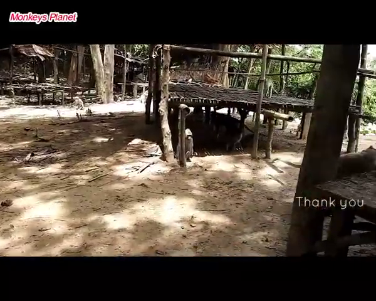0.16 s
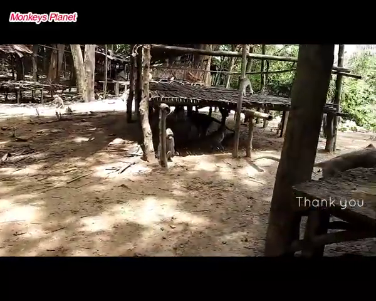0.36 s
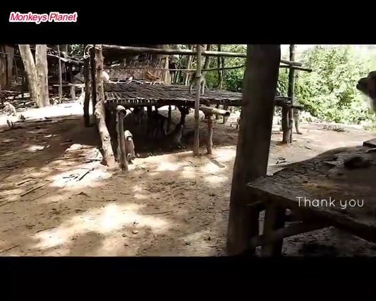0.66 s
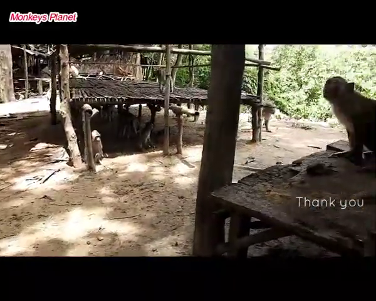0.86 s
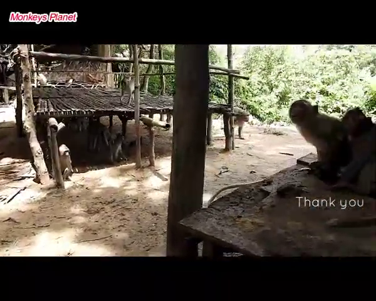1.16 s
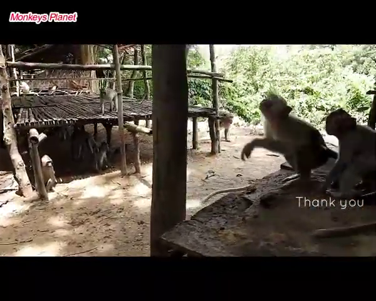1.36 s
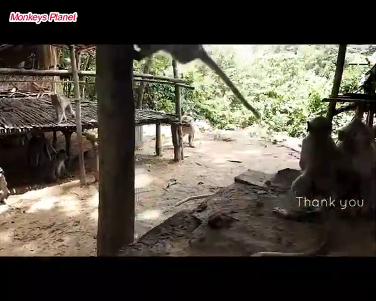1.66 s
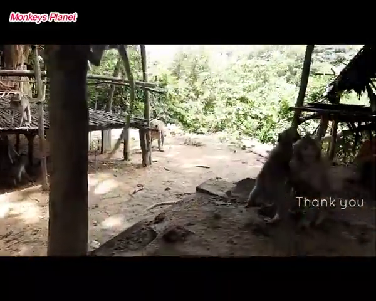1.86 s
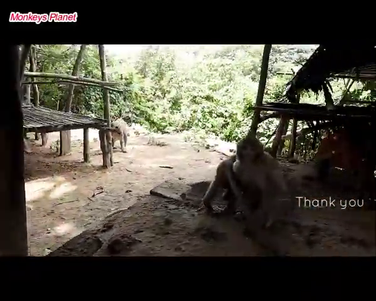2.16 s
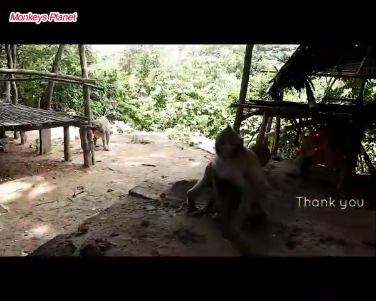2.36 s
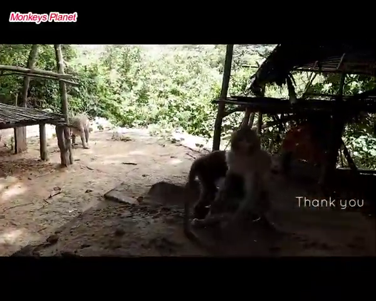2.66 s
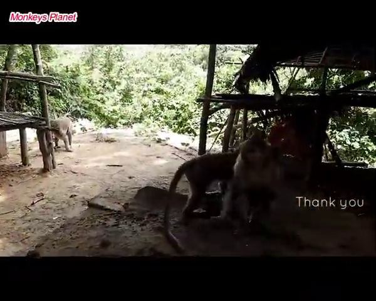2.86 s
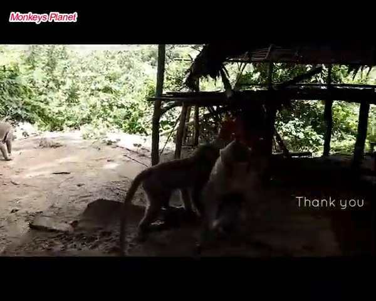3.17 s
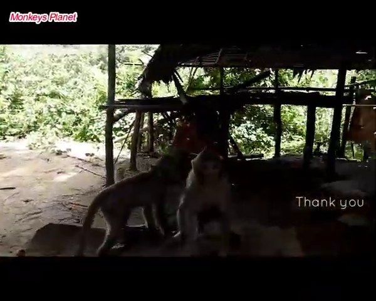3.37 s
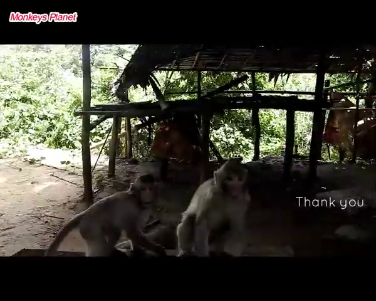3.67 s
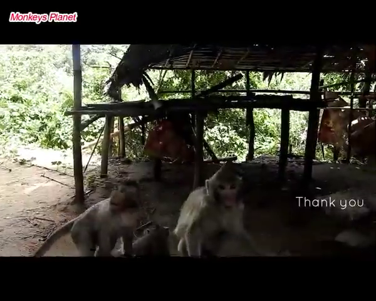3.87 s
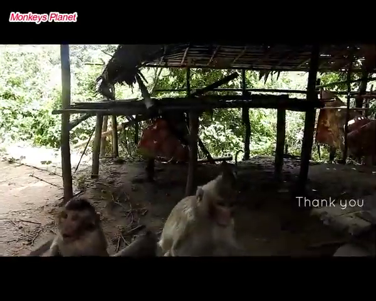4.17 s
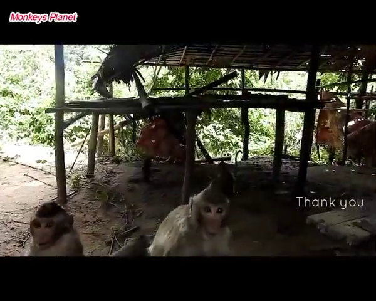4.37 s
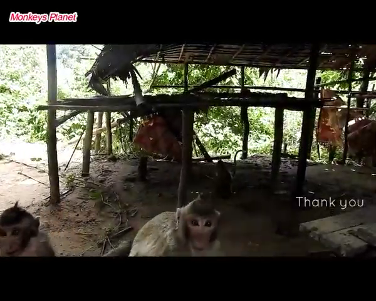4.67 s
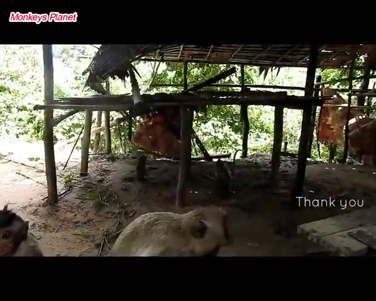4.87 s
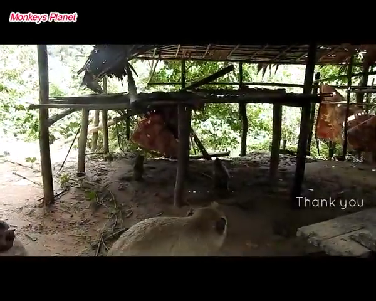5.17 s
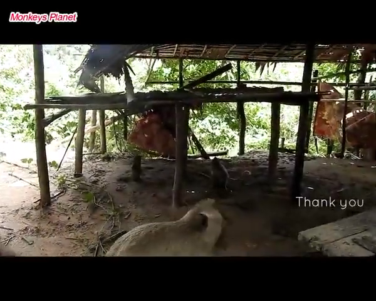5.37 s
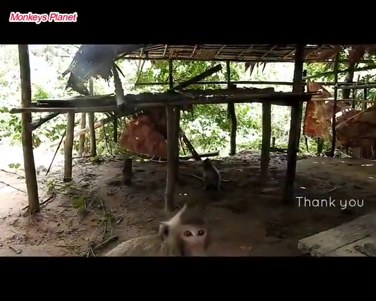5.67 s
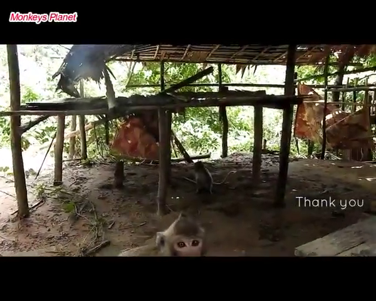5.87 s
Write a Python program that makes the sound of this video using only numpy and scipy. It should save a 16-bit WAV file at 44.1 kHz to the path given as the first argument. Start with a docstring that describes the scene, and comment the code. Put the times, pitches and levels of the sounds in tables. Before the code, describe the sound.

Harsh high monkey screams, two long then shorter ones, ring off wooden huts; afterwards low air buffeting and bumps on the microphone.

```python
"""A forest yard with wooden shelters: a macaque shrieks seven times, close to a hand-held camera.
Each shriek is two coupled oscillators: a high whistle beats against a lower fold vibration and turns to rasp.
Boards return early echoes, and huts and trees a noise tail. Cicadas drone in a wash of leaves, both filtered noise.
Puffs of air are lumpy low noise, handling thumps are short swings with a snap, knocks are grainy resonant bursts."""
import sys
import numpy as np
from scipy import signal
from scipy.fft import rfft, irfft, next_fast_len
from scipy.io import wavfile
from scipy.ndimage import uniform_filter1d, map_coordinates

SR = 44100
rng = np.random.default_rng(int(sys.argv[2]) if len(sys.argv) > 2 else 0)


def inscribe(sig):
    """Save sig as 16-bit PCM at rate SR to the path in sys.argv[1].

    A 1-D sig is mono; a 2-D sig holds one channel per row.
    Samples are clipped to [-1, 1] before scaling.
    """
    pcm = np.round(np.clip(np.atleast_2d(sig).T, -1, 1) * 32767)
    wavfile.write(sys.argv[1], SR, pcm.astype(np.int16))


N = 265638
TIME = np.arange(N) / SR


def amp(db):
    """Decibels to gain."""
    return 10 ** (np.asarray(db) / 20)


def unit(x):
    """Scales to rms 1."""
    return x / np.sqrt(np.mean(x ** 2) + 1e-20)


def steady(x, size=400):
    """Holds the short-time rms at 1 over a window of size samples."""
    return x / np.sqrt(abs(uniform_filter1d(x ** 2, size)) + 1e-12)


def read(points, hz):
    """Reads a spectrum table on a log-frequency axis."""
    f, value = np.transpose(points)
    return np.interp(np.log(hz + 1), np.log(f + 1), value)


def colour(x, points):
    """Filters by a table of (Hz, dB)."""
    n = x.shape[-1]
    size = next_fast_len(n + 1000)
    gain = amp(read(points, np.fft.rfftfreq(size, 1 / SR)))
    return irfft(rfft(x, size) * gain, size)[..., :n]


def wander(n, rate_hz):
    """Random drift of rms 1, rolled off above the rate."""
    hz = np.fft.rfftfreq(n, 1 / SR)
    return unit(irfft(rfft(rng.standard_normal(n)) / np.sqrt(1 + (hz / rate_hz) ** 4), n))


def hiss_at(hz, width_hz, n):
    """Noise in a resonance that follows hz."""
    angle = 2 * np.pi * np.cumsum(hz * np.ones(n)) / SR
    return unit(wander(n, width_hz / 2) * np.cos(angle) + wander(n, width_hz / 2) * np.sin(angle))


def ramp(t, length):
    """Smooth step from 0 to 1, centred on t = 0."""
    return .5 + .5 * np.sin(np.pi * np.clip(t / length, -.5, .5))


def bump(t, s, half_length):
    """Bell of height 1 around time s."""
    return np.exp(-((t - s) / half_length) ** 2)


def add(mix, s, sound):
    """Mixes a sound in at time s."""
    part = mix[..., max(round(s * SR), 0):][..., :sound.shape[-1]]
    part += sound[..., :part.shape[-1]]


def monkey(left_db=-0.7, right_db=-0.47):
    """The shrieks come from the right, so they reach the left port a little later."""
    # one row a shriek: start_s, length_s, level_db, swell_db from start to end,
    # low throat resonance: throat_db, throat_swell_db; coupling of the two vibrations [ratio], roughness [0-1],
    # soft lead_s, soft tail_s, soft_db of both, rasp left in them [0-1]
    shriek_rows = [(0, 0.5, -15, -0.5, -24.5, -7, 1.08, 0.86, 0.054, 0.015, -3.5, 0.52),
                   (0.733, 1.116, -14.5, -1.5, -29.5, 5, 0.91, 0.74, 0.21, 0.05, -6.5, 0.37),
                   (1.926, 0.38, -16, -3.5, -36.5, -24.5, 0.66, 0.74, 0.055, 0.018, -8.5, 0.51),
                   (2.469, 0.18, -17, 2.5, -48, 0, 2, 0.68, 0.042, 0.069, -6, 0),
                   (2.877, 0.14, -19.5, 0.5, -37, -16, 0.8, 0.73, 0.0263, 0.039, -3, 0.11),
                   (3.161, 0.22, -16.5, -2, -35.5, -23, 0.38, 0.87, 0.046, 0.04, -6.5, 0.3),
                   (3.517, 0.46, -16, 3, -33, 11, 0.88, 0.81, 0.034, 0.025, -4, 0.08)]
    # pitch of each shriek: time_s, whistle_hz, lower_vibration_hz
    pitch_curves = [
        [(0, 5400, 2750), (.05, 5740, 2886), (.092, 5480, 3205), (.113, 4300, 2565), (.19, 5100, 2890),
         (.25, 5484, 2700), (.33, 4450, 2560), (.4, 5160, 2398), (.485, 4606, 2344)],
        [(.735, 4985, 2190), (.762, 5400, 2102), (.788, 5180, 2050), (.84, 5293, 2012), (.895, 5415, 2800),
         (.92, 5380, 2200), (.955, 5730, 2606), (1.04, 5240, 2628), (1.06, 5155, 2508), (1.07, 5866, 1950),
         (1.11, 5094, 2193), (1.158, 6010, 2000), (1.183, 5460, 1897), (1.198, 5750, 1912), (1.215, 5290, 1850),
         (1.226, 5120, 2600), (1.3, 5282, 2555), (1.43, 4757, 2598), (1.51, 4690, 3012), (1.68, 4970, 2945),
         (1.745, 4606, 2463), (1.775, 4330, 2700), (1.805, 4310, 2805)],
        [(1.925, 5650, 2720), (1.97, 5475, 2702), (1.997, 6600, 2720), (2.015, 5440, 2725), (2.06, 5246, 2850),
         (2.12, 4850, 2456), (2.165, 5230, 3285), (2.2, 4670, 3120), (2.265, 4900, 2675), (2.3, 4390, 2674)],
        [(2.468, 5930, 1490), (2.488, 6680, 1496), (2.505, 6620, 1475), (2.518, 5800, 1500),
         (2.575, 5730, 1544), (2.59, 5190, 1630), (2.615, 5327, 1470), (2.65, 4150, 1520)],
        [(2.878, 6430, 1840), (2.905, 5910, 1813), (2.965, 5610, 1522), (2.99, 5520, 1480), (3.015, 4940, 1500)],
        [(3.162, 7210, 2210), (3.19, 5860, 2150), (3.235, 6610, 2217), (3.28, 5780, 2170), (3.352, 4660, 2000),
         (3.37, 4800, 2000), (3.384, 4670, 2000)],
        [(3.517, 5470, 2416), (3.529, 5930, 2410), (3.555, 5280, 2465), (3.72, 4296, 2509), (3.83, 4610, 2648),
         (3.885, 5200, 3297), (3.92, 4400, 2716), (3.939, 3950, 2555), (3.944, 5200, 2510), (3.975, 3960, 2480)],
    ]
    # bearing of the monkey as the camera turns: time_s, left_lag_samples
    bearing = [(0, 1.4), (2.5, 1.34), (3.6, 0.2)]
    # the camera body shades the left port: frequency_hz, gain_db
    left_shade = [(2700, -1.5), (4800, 0)]
    voice = np.zeros(N)
    for row, pitch in zip(shriek_rows, pitch_curves):
        add(voice, *shriek(row, pitch))
    lag = np.interp(TIME, *np.transpose(bearing))
    delayed = map_coordinates(voice, [np.arange(N) - lag], order=5)
    left = colour(delayed, left_shade)
    return np.array([amp(left_db) * left, amp(right_db) * voice]) + boards(voice)


def shriek(row, pitch, jitter=0.064, low_jitter=0.08, quaver=.033, rasp=0.77, flutter=0.48,
           low_rasp=0.62, low_rasp_width_hz=480, low_tear_db=2.5, tear_db=5.0, drain_db=-3.5,
           high_db=0.19, low_db=-1.26):
    """Two coupled oscillators; with roughness their pitch jitters and the tones dissolve into chaos."""
    # sum and difference tones: multiple of the whistle, multiple of the lower vibration
    tone_multiples = [(1, 0), (2, 0), (1, 1), (2, -1), (2, 1), (1, -1)]
    # relative strength of each tone: strength_db
    tone_strengths = [9, 2, 6, 5.5, 1, -1.5]
    # lower skirt of the throat resonance: frequency_hz, gain_db
    throat_skirt = [(1650, -9.5), (2250, 0)]
    t, whistle_hz, lower_hz, coupling, rough, level_db, throat_db = gesture(row, pitch)
    n = len(t)
    rough, coupling = np.clip(rough, .01, 1), abs(coupling)

    # each vibration hops between neighbouring regimes and slips from cycle to cycle
    slip = .085 + rough ** 1.5 * np.minimum(coupling + .4, 1)
    hops = [1 + quaver * rough * (np.tanh(2 * wander(n, 35)) + .5 * wander(n, 120)) for _ in range(2)]
    whistle_ratio = hops[0] + jitter * slip * wander(n, 568)
    lower_ratio = hops[1] + low_jitter * slip * wander(n, 414)
    whistle = 2 * np.pi * np.cumsum(whistle_hz * whistle_ratio) / SR
    lower = 2 * np.pi * np.cumsum(lower_hz * lower_ratio) / SR

    # each tone tears and returns on its own; the bare whistle gives way to the sum tones
    drained_db = drain_db * np.minimum(coupling, 1) ** 2
    tones = np.zeros(n)
    for (a, b), db in zip(tone_multiples, tone_strengths):
        tone_db = db + drained_db * (b == 0) + tear_db * rough * wander(n, 39)
        tones += amp(tone_db) * coupling ** abs(b) * np.cos(a * whistle + b * lower)

    chaos = np.clip(rasp * rough ** 1.42, 0, 1)
    turbulence = through_mouth(rng.standard_normal(n), t[0])
    high = np.sqrt(1 - chaos) * through_mouth(tones, t[0]) + np.sqrt(chaos) * turbulence
    low_hiss = low_rasp * np.sqrt(rough) * hiss_at(lower_hz, low_rasp_width_hz, n)
    low = steady(np.sqrt(1 - chaos) * np.cos(lower) + low_hiss)
    low = colour(low, throat_skirt) * amp(low_tear_db * wander(n, 33))

    # rough stretches come in irregular bursts a few milliseconds long
    bursts = steady(np.exp(flutter * rough * np.tanh(wander(n, 280))), size=900)
    voice = amp(level_db + high_db) * high + amp(throat_db + low_db) * low
    fade = np.clip(np.minimum(t - t[0], t[-1] - t) / .002, 0, 1)
    return t[0], voice * bursts * fade


def gesture(row, pitch, attack_s=0.0097, release_s=0.04, break_s=0.0341, mend_s=0.044,
            throat_per_effort=4, clean_throat_db=-17.5):
    """Course of one shriek: soft lead-in, loud rasp, soft tail; the low resonance grows with effort."""
    # the vibrations lock and the rasp clears into a chord:
    # time_s, half_length_s, share cleared [0-1], extra effort_db
    locks = [(0.12, 0.022, 0.53, 1.1), (0.179, 0.031, 0.49, 0.76), (1.04, 0.02, 0.9, 0.7),
             (1.079, .013, 0.61, 0.5), (1.175, 0.035, 0.57, -0.1), (1.243, 0.019, 0.65, 2),
             (1.43, 0.031, 0.36, 1), (1.723, 0.027, 0.58, -0.4), (1.997, 0.012, 0.57, 0.5),
             (2.05, 0.032, 0.19, 2.5), (2.115, 0.015, 0.76, 1.5), (2.181, 0.0266, 0.63, 1.5),
             (2.495, 0.013, 0.3, 7), (3.23, 0.03, 0.72, 1.7), (3.925, 0.0297, .55, 0.8)]
    # the effort falters: time_s, half_length_s, effort_db
    falters = [(0.799, 0.0095, -5), (0.969, .04, -1.5), (1.097, 0.045, -3), (3.745, 0.06, -3)]
    (start, length, level_db, swell_db, throat_db, throat_swell_db,
     coupling, rough, lead_s, tail_s, soft_db, soft_rasp) = row
    age = np.arange(0, length, 1 / SR)
    t, left, progress = start + age, length - age, age / length - .5
    s, whistle_hz, lower_hz = np.transpose(pitch)
    soft = 1 - ramp(age - lead_s, break_s) * ramp(left - tail_s, mend_s)
    broken = 1 - soft * (1 - soft_rasp)
    cleared = sum(share * bump(t, at, half) for at, half, share, _ in locks)
    effort_db = sum(db * bump(t, at, half) for at, half, *_, db in locks + falters)
    edges_db = 20 * np.log10(np.clip(np.minimum(age / attack_s, left / release_s), 1e-3, 1))
    level_db = level_db + edges_db + swell_db * progress + effort_db + soft_db * soft
    throat_db = throat_db + edges_db + throat_swell_db * progress + throat_per_effort * effort_db
    throat_db = throat_db + clean_throat_db * (1 - broken)  # the low resonance closes as the rasp goes
    return (t, np.interp(t, s, whistle_hz), np.interp(t, s, lower_hz),
            coupling * broken, rough * broken * (1 - cleared), level_db, throat_db)


def through_mouth(x, start):
    """The mouth's resonances shift as it opens and closes over a shriek."""
    # mouth response before tuning: frequency_hz, relative gain_db
    mouth = [(1500, -28.5), (2500, -13), (3800, -11), (4500, -9), (5300, -3.5), (6100, 1), (7200, 4.5),
             (8200, 3), (9300, -3), (10500, -9.5), (12000, -18), (15500, -32.5)]
    # tuning of the resonances: time_s, frequency ratio
    mouth_tuning = [(.07, 1.036), (.125, 0.99), (.24, 1.05), (.34, 0.99), (.4, 1.04), (.48, 0.94),
                    (.88, 1.134), (1.0, 1.065), (1.17, 1.01), (1.4, 1.02), (1.62, 1.06), (1.8, 0.97),
                    (1.95, 1.09), (2.55, 1), (2.95, 1.027), (3.28, 1.02), (3.6, 0.98), (3.73, .93),
                    (3.9, 1.074), (3.98, 0.88)]
    hz, frame_s, z = signal.stft(x, SR, nperseg=256)
    ratio = np.interp(start + frame_s, *np.transpose(mouth_tuning))
    gain = amp(read(mouth, hz[:, None] / ratio))
    return steady(signal.istft(z * gain, SR, nperseg=256)[1][:len(x)])


def boards(x, early_db=-4.5, early_s=0.0082, drift_hz=1.563):
    """Early echoes off posts and boards; the pattern drifts as the camera swings."""
    out = np.zeros((2, N))
    drift = 2 * np.pi * drift_hz * TIME
    for weight in (np.cos(drift), np.sin(drift)):
        at = rng.integers(SR // 800, SR // 45, (2, 14))  # echo delays in samples, 14 a port
        taps = np.zeros((2, SR // 45))
        echoes = rng.choice([-1, 1], at.shape) * np.exp(-at / SR / early_s)
        np.put_along_axis(taps, at, echoes, 1)
        taps /= np.linalg.norm(taps, axis=1, keepdims=True)
        out += signal.oaconvolve((weight * x)[None], taps, axes=1)[:, :N]
    return amp(early_db) * out


def thumps(level_db=-1, ring_hz=230, stiffening=0.494, cycles=0.55, spread=0.16, snap_s=0.00027):
    """Each bump swings the casing once or twice; harder ones are quicker and snap at the peak."""
    # thumps on the camera: start_s, strength_db, snap_db relative to the strength
    bumps = [(0.706, -13, 6.5), (0.732, -7, -7), (0.757, -13.5, 1), (0.928, -15.5, -14),
             (2.824, -12.5, -21), (2.911, -10, -4), (3.015, -13, -20), (3.554, -8.5, -6), (3.946, -11, -7),
             (4.247, -11.5, -8), (4.336, -8, 2.5), (4.359, -10.5, -1), (4.484, -9, -3), (4.746, -11, -19),
             (5.524, -7, -7), (5.585, -4.5, -14), (5.682, -8.5, 0.5), (5.781, -3.5, -8), (5.827, -9, -14)]
    out, t = np.zeros((2, N)), np.arange(SR // 10) / SR
    for (s, db, snap_db), detune in zip(bumps, rng.standard_normal((len(bumps), 2, 1))):
        hz = ring_hz * amp(stiffening * db)
        age = t * hz / cycles
        swing = age * np.exp(1 - age) * np.sin(2 * np.pi * hz * np.exp(spread * detune) * t)
        snap = amp(snap_db) * amp(db) * np.exp(-abs(t - cycles / hz) / snap_s)
        add(out, s, amp(db + level_db) * (swing - 2 * snap))
    return out


def buffeting(level_db=-1, lumps_db=3.0, fast_hz=175, fast_width_hz=80, fast_db=5):
    """Lumpy eddies, unrelated at each port; strong gusts add faster ones."""
    # colour of the eddies: frequency_hz, relative level_db per Hz
    eddy_colour = [(20, -46), (45, -5.5), (75, 4), (110, 1.5), (190, -9.5), (260, -31), (400, -33),
                   (3000, -65)]
    strength = amp(level_db) * airflow()
    lumps = amp(lumps_db * wander(N, 19.7))
    eddies = steady(colour(rng.standard_normal((2, N)), eddy_colour) * lumps, size=3200)
    fast = np.array([hiss_at(fast_hz, fast_width_hz, N) for _ in range(2)])
    return strength * (eddies + amp(fast_db) * strength * fast)


def airflow(calm_db=-37, calm_rise_db_per_s=1.5, rise_s=0.018, fall_s=0.022):
    """Strength of the air at each port: a slowly growing calm, and gusts that rise, hold and die away."""
    # gusts and sways of air: start_s, length_s, level_db, swell_db from start to end, left_minus_right_db
    gusts = [(0.701, 0.29, -27, -2.5, 15), (1.186, .21, -26.5, 1.5, 9), (1.867, 0.026, -24, -1, 9.5),
             (2.128, 0.07, -23.5, -4, 10), (2.261, 0.031, -23, -2, 10), (2.397, 0.051, -21.5, -1, 10.5),
             (2.54, 0.41, -33, 12, 1), (3.546, 0.23, -17.5, -2.5, -1), (3.924, 0.041, -18, 4, -0.5),
             (4.207, 0.16, -17, 10.5, 5), (4.459, 0.532, -22.5, 1.5, 4), (5.198, 0.25, -19.5, 9.5, -3),
             (5.516, 0.11, -11.5, -0.5, -0.5), (5.681, 0.16, -10, 1.5, -2), (5.904, 0.024, -18.5, 4, 9),
             (5.984, .04, -10.5, -5, 2)]
    power = amp(calm_db + calm_rise_db_per_s * TIME) ** 2 * np.ones((2, 1))
    for start, length, db, swell_db, pan_db in gusts:
        age = TIME - start
        shape = ramp(age, rise_s) * np.exp(-np.maximum(age - length, 0) / fall_s)
        gust = shape * amp(db + swell_db * (np.clip(age / length, 0, 1) - .5))
        power = power + (gust * amp([[pan_db / 2], [-pan_db / 2]])) ** 2
    return np.sqrt(power)


def overload(x, ceiling=0.44):
    """The microphone flattens the strongest pushes of air, which makes them crackle."""
    return x / (1 + (x / ceiling) ** 12) ** (1 / 12)


def crunches(width=1.0, grain_db=4):
    """Short grainy bursts in a broad resonance, as wide as width times its centre."""
    # knocks and crunches on wood and litter: start_s, level_db, centre_hz, decay_s to -60 dB
    knocks = [(0.014, -18, 914, 0.037), (0.446, -25, 1079, 0.083), (2.012, -31.5, 823, 0.11),
              (3.435, -33, 794, 0.1), (5.289, -29, 1102, 0.067), (5.405, -34, 1298, 0.19),
              (5.473, -23, 2410, 0.055), (5.539, -31.5, 4510, 0.058), (5.936, -31, 2420, 0.073)]
    out, t = np.zeros(N), TIME[:SR // 4]
    attack = np.minimum(t / .001, 1) ** 2
    for s, db, hz, t60 in knocks:
        grains = unit(amp(grain_db * wander(len(t), 190)))
        burst = grains * hiss_at(hz, width * hz, len(t)) * attack
        add(out, s, amp(db - 60 * t / t60) * burst)
    return out + boards(out)


def yard(x):
    """Huts and trees leave a short diffuse tail: noise that dies away at its own pace in each band."""
    # decay of the yard: frequency_hz, decay_s to -60 dB
    decay = [(3000, 0.49), (7000, 0.64), (13000, 0.39)]
    # level of the tail as the camera turns away from the huts: time_s, level_db
    tail_level = [(.5, -10), (1.9, -15), (2.7, -17), (4, -15.5)]
    noise = rng.standard_normal((2, SR)) * (TIME[:SR] > .012)  # the tail waits 12 ms
    hz, frame_s, z = signal.stft(noise, SR, nperseg=256)
    fading = amp(-60 * frame_s / read(decay, hz)[:, None])
    tail = signal.istft(z * fading, SR, nperseg=256)[1]
    wet = signal.fftconvolve(x, tail / np.linalg.norm(tail[0]), axes=1)[:, :N]
    return amp(np.interp(TIME, *np.transpose(tail_level))) * wet


def forest(wash_db=-33.5, insect_hz=6710, insect_db=-46):
    """A wash of leaves and far insects, with one narrow cicada drone."""
    # colour of the wash: frequency_hz, relative level_db per Hz
    wash_colour = [(30, -9.5), (150, 4), (400, -7.5), (800, -8), (1400, -12), (3500, -14.5), (5500, -12.5),
                   (6800, -7.5), (8000, -18), (10000, -32.5), (15500, -62)]
    # left-right likeness of the wash: frequency_hz, correlation [-1 to 1]
    likeness = [(100, 0.99), (800, 0.92), (2800, 0.84), (6800, 0.12)]
    a, b = rfft(rng.standard_normal((2, N)))
    same = np.clip(read(likeness, np.fft.rfftfreq(N, 1 / SR)), -1, 1)
    noise = irfft(np.array([a, same * a + np.sqrt(1 - same ** 2) * b]), N)
    wash = unit(colour(noise, wash_colour))
    cicada = np.array([hiss_at(insect_hz + 30 * wander(N, 1), 110, N) for _ in range(2)])
    swell = amp(.4 * wander(N, 6))
    return amp(wash_db) * wash * swell + amp(insect_db) * cicada


def ducking(near, threshold_db=-19, slope=.7, recovery_db_per_s=130):
    """Gain that falls while near sounds are loud and recovers quickly."""
    power = abs(uniform_filter1d((near ** 2).mean(0), size=400))
    power_db = 10 * np.log10(power + 1e-12)
    fall = TIME * recovery_db_per_s
    held_db = np.maximum.accumulate(power_db + fall) - fall  # peaks held, then sinking steadily
    over_db = np.maximum(held_db - threshold_db, 0)
    return amp(-slope * uniform_filter1d(over_db, size=200))


def scene():
    """Near sounds push the far ones down, so the yard's tail swells back after each shriek."""
    airborne = monkey() + crunches()
    near = airborne + overload(buffeting() + thumps())
    far = forest() + yard(airborne)
    return near + far * ducking(near)


def record(dry, edge_hz=15700):
    """Peaks are rounded just under full scale; then the recorder's band limit."""
    limited = dry / (1 + (dry / .92) ** 12) ** (1 / 12)
    lowpass = signal.firwin(511, edge_hz, window=("kaiser", 9), fs=SR)
    return signal.oaconvolve(limited, lowpass[None], "same")


dry = scene()
out = record(dry)
inscribe(out)
```